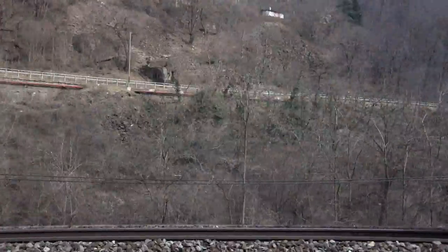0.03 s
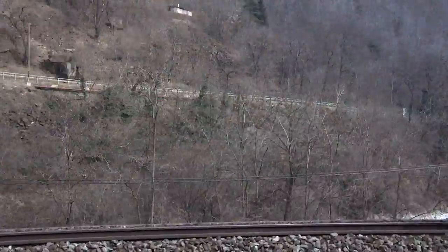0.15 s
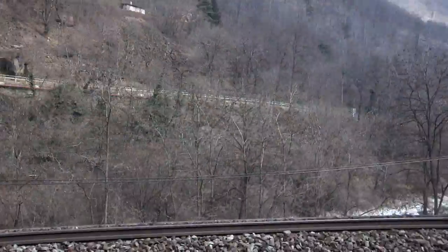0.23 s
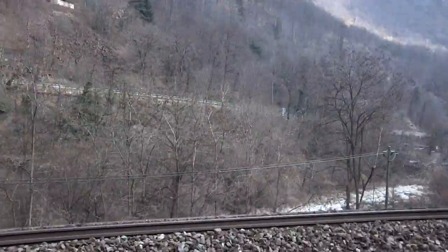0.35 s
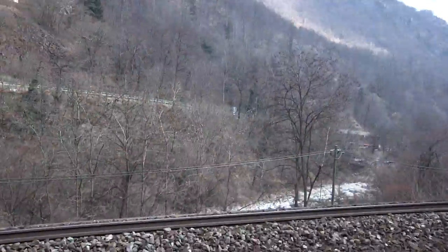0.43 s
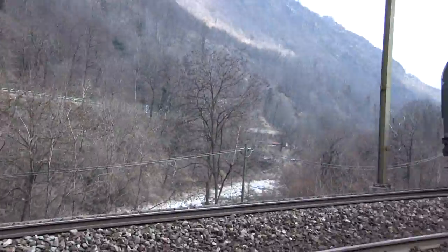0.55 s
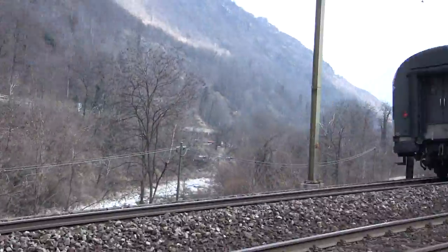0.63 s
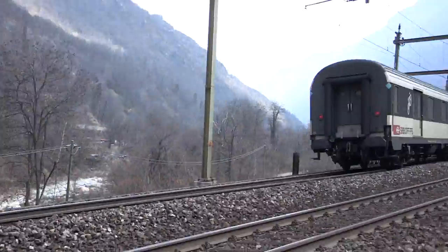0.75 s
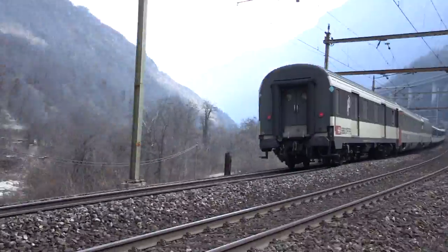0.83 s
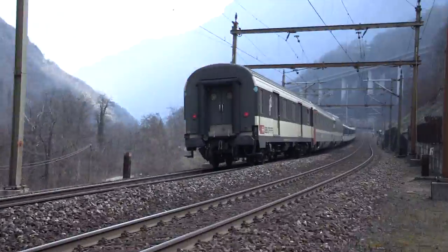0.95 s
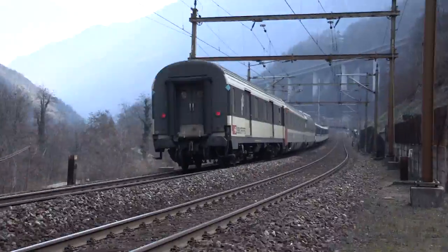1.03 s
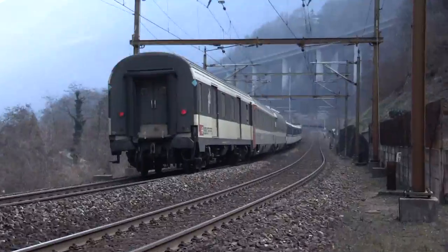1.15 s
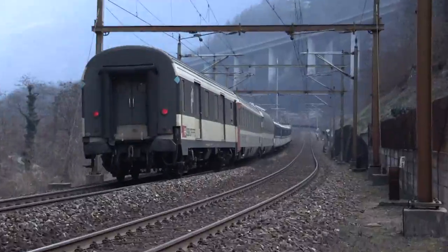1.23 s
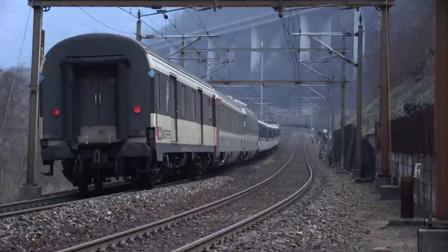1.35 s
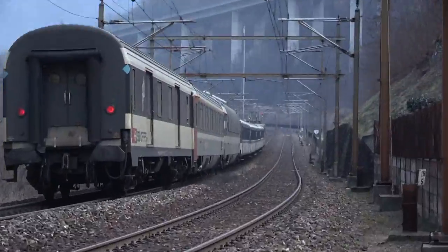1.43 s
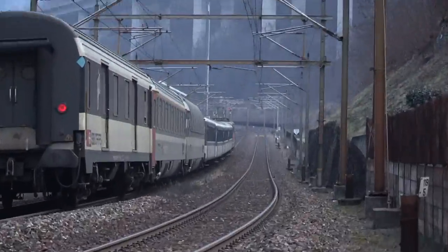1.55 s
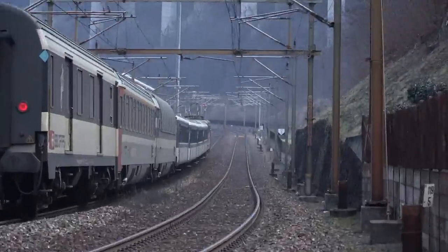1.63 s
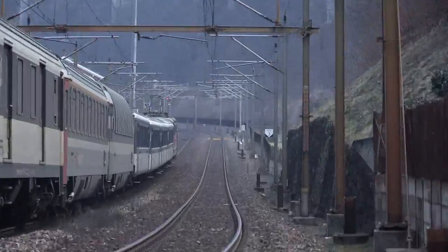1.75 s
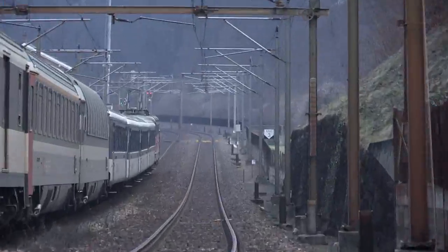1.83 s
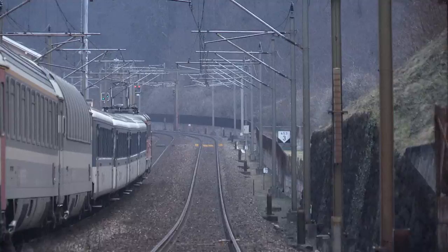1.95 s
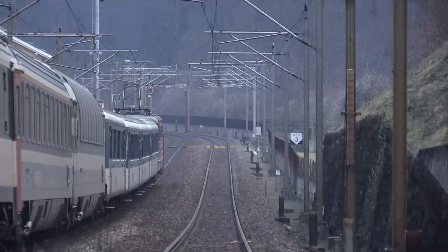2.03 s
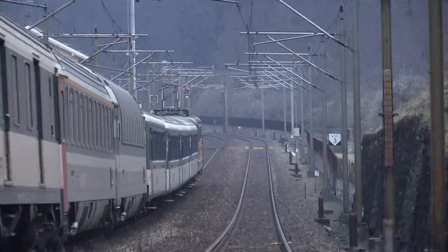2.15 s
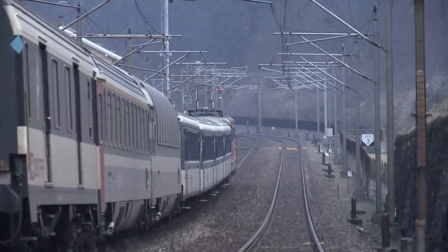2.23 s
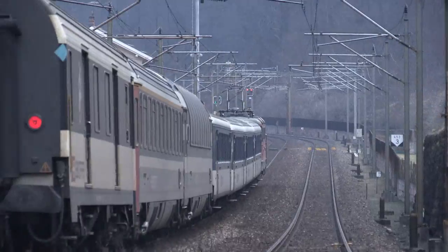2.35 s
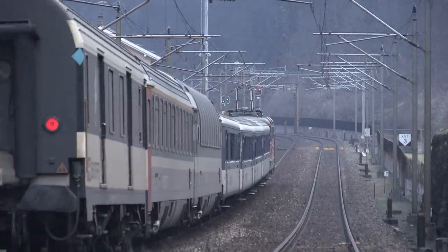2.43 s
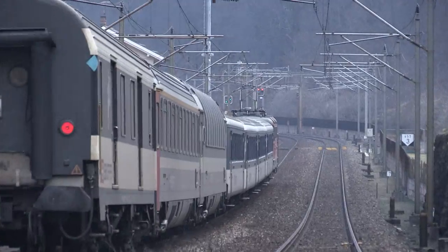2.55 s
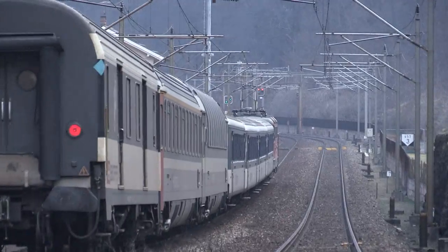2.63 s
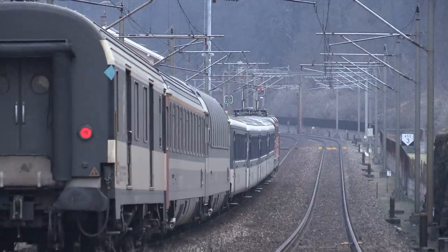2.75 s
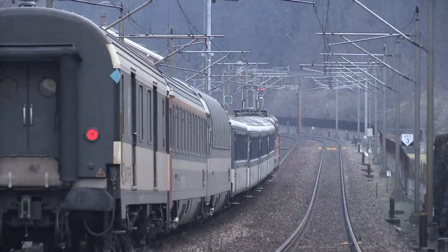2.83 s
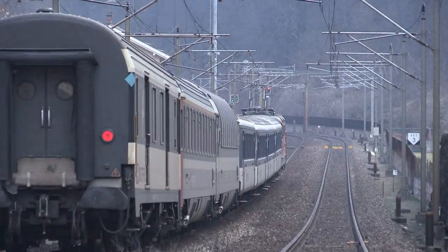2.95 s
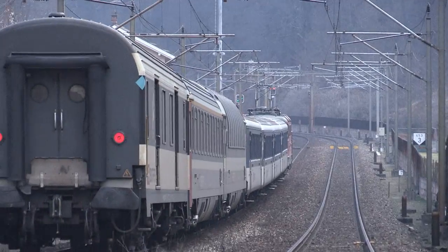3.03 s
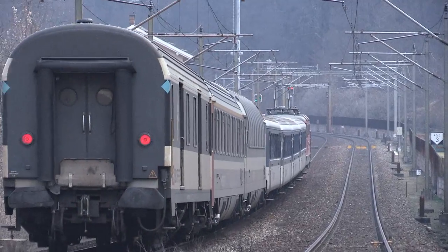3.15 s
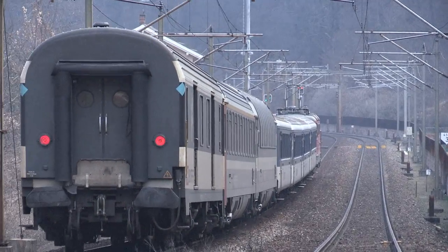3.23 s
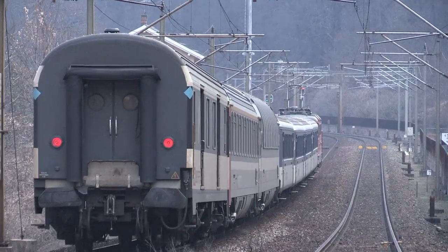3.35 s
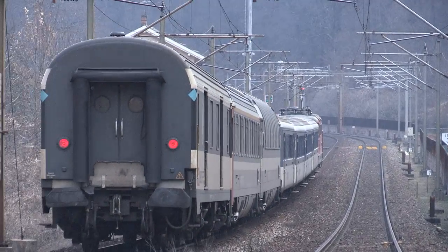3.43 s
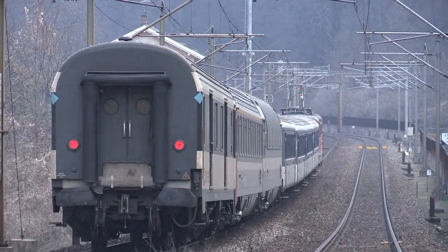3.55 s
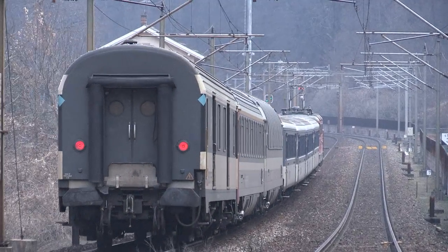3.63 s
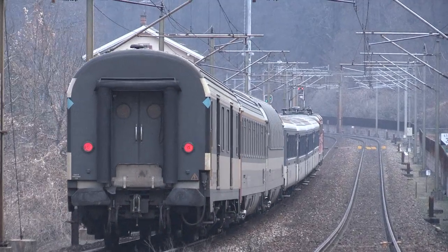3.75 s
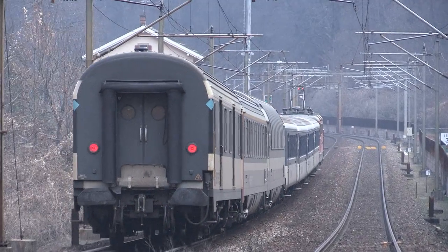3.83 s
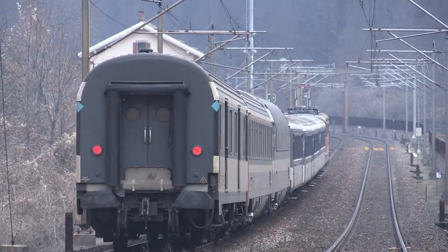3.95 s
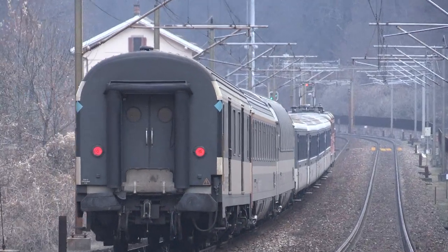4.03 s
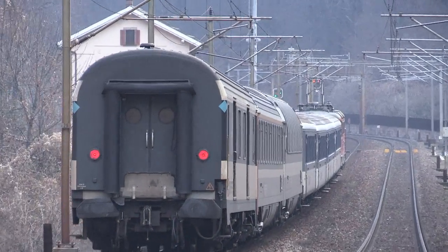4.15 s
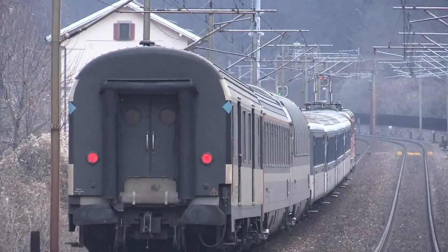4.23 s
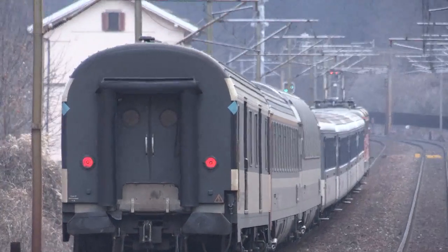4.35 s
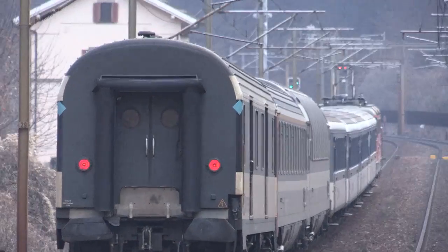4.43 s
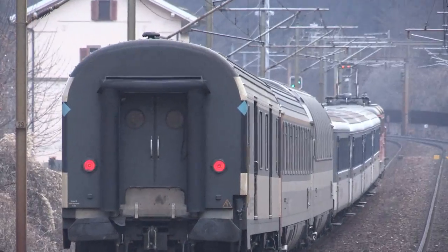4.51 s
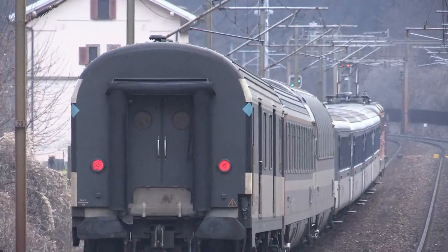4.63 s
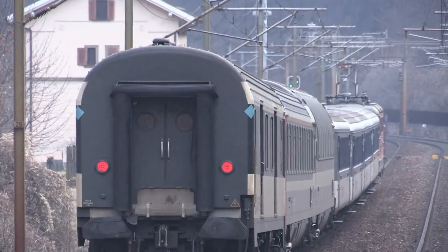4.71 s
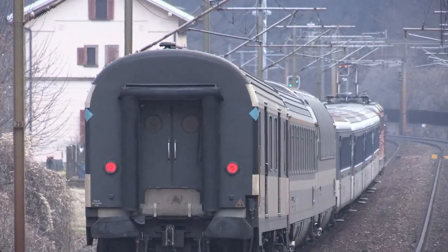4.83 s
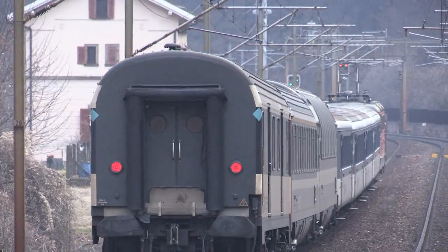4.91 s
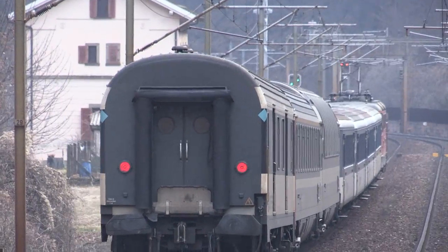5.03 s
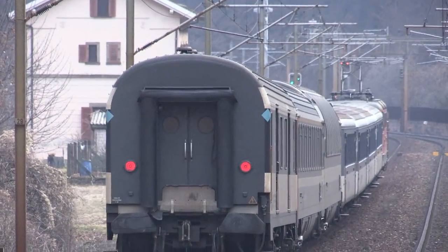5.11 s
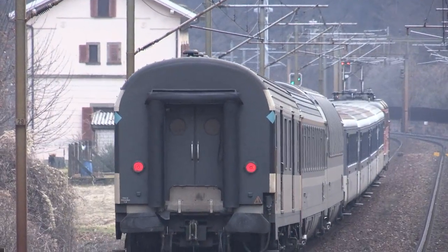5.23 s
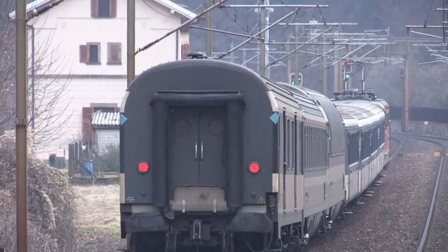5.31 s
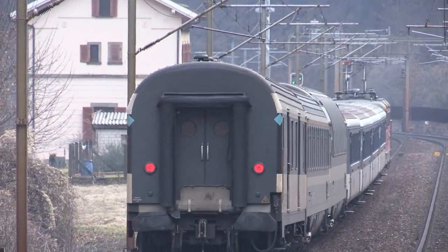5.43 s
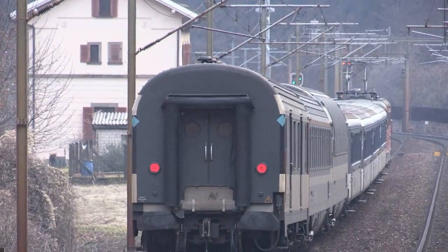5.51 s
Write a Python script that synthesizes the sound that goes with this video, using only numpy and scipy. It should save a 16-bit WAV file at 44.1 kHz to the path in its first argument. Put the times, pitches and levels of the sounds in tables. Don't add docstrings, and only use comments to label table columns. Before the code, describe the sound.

Outdoors in a valley, the tail of an electric train has just passed a hand-held camera. A loud, gritty wheel-and-rail roar with deep bass falls steeply over three seconds. Behind it, far rolling and high bell-like wheel ringing remain, with flange squeals biting harder around four to five seconds. A soft gust buffets the stereo microphone near the end, then one hollow knock.

```python
import sys
import numpy as np
from scipy import signal
from scipy.fft import rfft, irfft, next_fast_len
from scipy.io import wavfile
from scipy.ndimage import uniform_filter1d, map_coordinates

SR = 44100
rng = np.random.default_rng(int(sys.argv[2]) if len(sys.argv) > 2 else 0)


def volts(x):
    e = np.asarray(x, float) / 20
    return 10 ** e


def dump_mix(stems):
    frames = np.atleast_2d(stems).T
    limited = np.clip(frames, -1, 1)
    pcm = np.round(limited * 32767).astype(np.int16)
    wavfile.write(sys.argv[1], SR, pcm)


N = 246078
T = np.arange(N) / SR

# (time [s], sleeper roar level [dB])
COACH_ROAR = [(0, -13.5), (.25, -16), (.5, -18), (.8, -21.5), (1.0, -24), (1.25, -28), (2.0, -34),
              (2.3, -37.5), (2.75, -42), (2.95, -49.5), (3.6, -52)]


def unit(x):
    return x / np.sqrt(np.mean(x ** 2) + 1e-20)


def along(points, hz):
    f, v = np.transpose(points)
    return np.interp(np.log(hz + 1), np.log(f + 1), v)


def colour(points):
    return lambda hz: volts(along(points, hz))


def curves(rows):
    s, *cols = np.transpose(rows)
    return [np.interp(T, s, c) for c in cols]


def wobble(rate):
    knots = rng.standard_normal(int(N * rate / SR) + 4)
    return map_coordinates(knots, [T * rate])


def filtered(x, response):
    m = next_fast_len(N + SR // 2)
    hz = np.fft.rfftfreq(m, 1 / SR)
    return irfft(rfft(x, m) * response(hz), m)[..., :N]


def peak(hz, centre, width):
    return 1 / (1 + (2 * (hz - centre) / width) ** 2)


def rush(gain, alike, patchy_db):
    # (frequency [Hz], lead [radians])
    ear_lead = [(60, 0), (340, 0.28), (1030, 0.55), (3200, 0), (8000, 0)]
    z = signal.stft(rng.standard_normal((2, N)), nperseg=512)[2]
    patches = rng.standard_normal(z.shape[1:])
    patches = uniform_filter1d(patches, size=4, axis=0)
    patches = uniform_filter1d(patches, size=12, axis=1)
    pair = signal.istft(z * volts(patchy_db * unit(patches)), nperseg=512)[1][:, :N]

    def middle_and_side(hz):
        turn = np.arccos(np.clip(along(alike, hz), -1, 1)) / 2
        return gain(hz) * [np.cos(turn), np.sin(turn)]

    mid, side = filtered(pair, middle_and_side)
    lead = lambda hz: np.exp(.5j * np.outer([1, -1], along(ear_lead, hz)))
    return unit(filtered(np.array([mid + side, mid - side]), lead))


def hump(centre_hz, level_db, width_hz, apart):
    band = filtered(rng.standard_normal((3, 2, N)), lambda hz: np.exp(-(hz / width_hz) ** 2))
    turns = 2 * np.pi * np.cumsum(centre_hz + 0 * T) / SR
    tone = band[:, 0] * np.cos(turns) + band[:, 1] * np.sin(turns)
    return volts(level_db) * unit(tone[0] + apart * tone[1:])


def panned(x, pan_db):
    return x * volts(np.outer([.5, -.5], pan_db))


def swing(before, after):
    turn_s, turn_length_s = 0.73, .35
    return before + (after - before) / (1 + np.exp(-(T - turn_s) / (turn_length_s / 2)))


def far_pan():
    return swing(before=-7.5, after=1.7)


def last_coach():
    # (frequency [Hz], level [dB per Hz])
    track_colour = [(35, -84), (60, -47), (107, -25.5), (188, -8), (240, -13), (312, -17), (347, -4.5),
                    (386, -6.5), (450, -1.5), (592, -6.5), (964, -3.5), (1190, -10), (1750, -16),
                    (1920, -16.5), (2300, -19), (2990, -55), (5060, -120)]
    # (frequency [Hz], level [dB per Hz])
    contact_colour = [(1470, -38), (2500, -1), (2760, -13.5), (4950, -17), (6480, -18.5), (9490, -18.5),
                      (13300, -26.5), (15000, -29)]
    # (frequency [Hz], width [Hz], level [dB])
    track_modes = [(196, 8.3, 2.5), (374, 72, -2.5), (482, 51, 5.5), (528, 49, 1.5), (720, 51, -8),
                   (990, 58, -9.5), (990, 48, -8)]
    # (frequency [Hz], likeness [0 to 1])
    near_alike = [(60, 0.77), (130, 1), (290, 0.81), (640, 0.98), (1410, 0.63), (3100, 0.5), (6820, 0.19),
                  (15000, 0.46)]

    roar_db, = curves(COACH_ROAR)
    lost_db = roar_db[0] - roar_db
    pan_db = swing(before=-2.2, after=3)
    shake_db = 1.12
    hiss_db = np.maximum(-39.5 - 1.39 * lost_db, -75)
    sleeper_db = 1.07 * shake_db * wobble(23.98)
    rail_db = -1 + 0.12 * lost_db + shake_db * wobble(9.77)
    boom_db = 9 * np.exp(-T / 0.36)
    ballast_db = -21.5 + 0.33 * lost_db + boom_db + shake_db * wobble(11.54)
    ground_db = -4.5 + .15 * lost_db
    fade_db = -30 * np.clip(T - 3.0, 0, None)
    beat_db = .9 * wobble(30)

    def track_gain(hz):
        modes = np.sqrt(sum(volts(2 * db) * peak(hz, c, w) for c, w, db in track_modes))
        return colour(track_colour)(hz) * (0.92 + 0.57 * modes)

    roar = rush(track_gain, near_alike, patchy_db=0.86)
    above = lambda hz, edge_hz: 1 / (1 + (edge_hz / (hz + 1)) ** 6)
    ballast = filtered(roar, lambda hz: 1 - above(hz, edge_hz=270))
    ground = filtered(ballast, lambda hz: 1 - above(hz, edge_hz=174))
    rail = filtered(roar, lambda hz: above(hz, edge_hz=770))
    sleepers = roar - ballast - rail
    bass = ballast + (volts(ground_db) - 1) * ground
    bass = panned(bass, 4.5 - 1.4 * pan_db)
    roar = volts(sleeper_db) * sleepers + volts(ballast_db + 14) * bass + volts(rail_db) * rail

    hiss = rush(colour(contact_colour), near_alike, patchy_db=.4)
    hiss = panned(hiss, np.minimum(0.87 * pan_db, 0))
    roar = volts(roar_db + 3.0 + fade_db + beat_db) * roar
    hiss = volts(hiss_db + 6 + fade_db + 0.45 * beat_db) * hiss
    return panned(roar + hiss, pan_db)


def grinding():
    # (start [s], length [s], rise over the steady howl [dB])
    bites = [
        (3.85, 0.46, 9.5),
        (4.488, 0.47, 10.5),
    ]
    bite_s, let_go_s, sag_db = 0.086, 0.19, 5
    total_db = 0
    for s, length, db in bites:
        steps = np.cumsum([0, bite_s, length, let_go_s])
        total_db = total_db + np.interp(T - s, steps, [0, db, db - sag_db, 0])
    return total_db


def train_levels():
    # (time [s], rolling level [dB])
    distance = [(0, -34.5), (.2, -39), (.35, -38), (.55, -39.5), (.85, -41.5), (1.0, -43), (1.4, -46),
                (2.0, -48.5), (2.25, -51.5), (3.0, -54.5), (3.6, -54.5), (4.1, -53.5), (4.7, -57),
                (5.1, -54), (5.58, -54.5)]
    # (time [s], song above rolling [dB])
    slip = [(0, 4), (1.0, 6), (1.3, -1), (1.65, 6), (2.1, 2.5), (2.55, 7.5), (2.95, -0.5), (3.6, 0),
            (3.9, 5.5), (4.15, 7.5), (4.3, 12), (4.45, 7.5), (4.52, 14.5), (4.7, 11.5), (4.8, 10),
            (5.05, 10.5), (5.25, 1.5), (5.58, -14)]
    rolling_db, = curves(distance)
    slip_db, = curves(slip)
    sink_db = 4 * np.clip(T - 4.17, 0, None)
    flange_db = -3.5 + 0.23 * grinding() - sink_db
    return rolling_db, slip_db, flange_db


def far_train():
    # (frequency [Hz], level [dB per Hz])
    rolling_colour = [(29, -59), (50, -25), (448, -5), (562, -5.5), (809, 0), (1170, -6), (1440, -2.5),
                      (1600, -6), (2180, -12), (2380, -7.5), (3200, -23.5), (4160, -54), (7040, -120)]
    # (frequency [Hz], level [dB per Hz])
    flange_colour = [(1650, -16.5), (2800, 0), (4280, -9.5), (4750, -8.5), (6180, -18.5), (6460, -20.5),
                     (6980, -23), (9000, -40.5), (11700, -77), (19800, -120)]
    # (frequency [Hz], likeness [0 to 1])
    far_alike = [(60, 0.86), (180, 0.92), (550, 0.81), (1650, 0.86), (4970, 0.78), (15000, 0.72)]
    # (time [s], centre [Hz])
    howl_pitch = [
        (2.2, 1297),
        (3.5, 1410),
        (3.9, 1395),
        (4.7, 1254),
        (5.58, 1249),
    ]
    # (time [s], centre [Hz])
    drone_pitch = [
        (0, 761),
        (.3, 793.2),
        (1.0, 990),
        (1.4, 976.3),
        (2.8, 859.5),
    ]
    rolling_db, _, flange_db = train_levels()
    pan_db = far_pan()
    rolling = rush(colour(rolling_colour), far_alike, patchy_db=-0.7)
    rolling += volts(flange_db - 3) * rush(colour(flange_colour), far_alike, patchy_db=1.0)

    howl_db = -50.5 + grinding() + 0.87 * wobble(25)
    howl_db = howl_db - 35 * np.clip(2.93 - T, 0, None)
    howl = hump(curves(howl_pitch)[0], howl_db, width_hz=153, apart=0.37)

    drone_db = curves(COACH_ROAR)[0] - 7.5 + 0.5 * wobble(3.93)
    drone = hump(curves(drone_pitch)[0], drone_db, width_hz=97, apart=0.42)
    far_drone_db = -51 + 1.7 * wobble(9) - 40 * np.clip(3.8 - T, 0, None)
    drone += hump(766, far_drone_db, width_hz=84, apart=0.23)

    rolling = volts(rolling_db + 11.5 + 0.27 * wobble(12)) * rolling
    return panned(rolling + howl, pan_db) + panned(drone, 0.41 * pan_db)


def ringing(modes, flicker_db):
    ring = np.zeros((2, N))
    for c, w, db in modes:
        slow = filtered(rng.standard_normal((2, N)), lambda hz: peak(hz, 0, 1.63 * w))
        spread = np.exp(1j * 0.35 * np.array([wobble(13), wobble(19)]))
        tone = np.exp(2j * np.pi * c * T) * spread * (unit(slow[0]) + 1j * unit(slow[1]))
        ring += volts(db + flicker_db * wobble(18)) * np.real(tone)
    return ring


def wheels():
    # (frequency [Hz], width [Hz], level [dB])
    wheel_modes = [(1780, 29, 1), (1807, 18, -5), (2301, 10, -16), (2317, 10, -9), (2385, 19.5, 7),
                   (2463, 65, 4), (2830, 5.9, -4), (2930, 13, -11.5), (2896, 17, -6), (3050, 16, -7),
                   (3070, 10, -6), (3360, 39, -4.5), (3430, 36, -5.5), (3640, 17, -8), (3790, 22, -23),
                   (3940, 14, -11), (3930, 39, -5), (4550, 9.6, -18), (4570, 14, -21), (4720, 15, -11),
                   (4760, 16, -33.5), (4880, 16, -14), (5400, 5.3, -15), (5350, 5.1, -14), (6140, 16, -48),
                   (5792, 16, -47), (5960, 5.4, -21), (6169, 8.4, -41), (6670, 16, -40), (6860, 16, -31.5)]
    # (time [s], frequency [Hz], level [dB], length [s])
    squeals = [(0.317, 2420, -27, 0.13), (0.717, 1820, -26, 0.094), (1.037, 2440, -29.5, 0.061),
               (2.401, 4888, -52, 0.077), (2.67, 3410, -51, 0.09), (2.897, 4100, -50, 0.14),
               (3.15, 5270, -58, 0.29), (3.312, 4020, -54, 0.16), (3.413, 6058, -56, 0.073),
               (3.695, 5306, -55, 0.08), (3.795, 2930, -40, 0.13), (3.93, 6177, -61, 0.09),
               (4.016, 5370, -54, 0.12), (4.04, 4521, -50, 0.12), (4.072, 4830, -52, 0.08),
               (4.15, 2846, -42, 0.2), (4.17, 3350, -43, 0.07), (4.314, 4010, -50, 0.12),
               (4.4, 6054, -52, 0.079), (4.432, 5300, -57, 0.12), (4.564, 3790, -49, 0.095),
               (4.61, 4879, -55, 0.13), (4.684, 6100, -58, 0.17), (4.716, 1823, -44.5, 0.23),
               (4.962, 4850, -55, 0.095), (5.005, 3720, -52, 0.49), (5.06, 2880, -45, 0.11),
               (5.15, 5401, -63, 0.14), (5.32, 1819, -43.5, 0.16), (5.438, 2442, -42, 0.1)]
    rolling_db, slip_db, flange_db = train_levels()
    sing_db = rolling_db + slip_db + 1.4 * wobble(40)
    family = ringing([m for m in wheel_modes if 2300 < m[0] < 2500], flicker_db=1.0)
    family /= np.sqrt(np.abs(uniform_filter1d(family[0] ** 2, size=4000)) + 1e-9)
    others = ringing([m for m in wheel_modes if not 2300 < m[0] < 2500], flicker_db=2.0)
    smear_db = -2.5 * np.clip(2.8 - T, 0, None)

    song = np.zeros(N)
    for s, hz, db, length in squeals:
        cycles = np.cumsum(hz + 13 * wobble(70)) / SR
        squeal_db = db + 3 * wobble(60) - 2.5 * (hz < 3500)
        swell = np.exp(-(2.36 * (T - s) / length) ** 2)
        song += volts(squeal_db) * swell * np.sin(2 * np.pi * cycles)

    ring = volts(sing_db + 0.5 + 0.85 * smear_db) * family
    ring = ring + volts(rolling_db + flange_db + smear_db) * others
    return panned(ring + volts(-1.8) * song, far_pan())


def camera_hiss():
    # (frequency [Hz], level [dB per Hz])
    hiss_colour = [(4410, -33.5), (7500, -18), (9910, -6.5), (10400, -7), (12500, -4), (14500, -3.5)]
    # (time [s], level [dB])
    hiss_level = [
        (0, -70),
        (1.5, -62.5),
        (4.4, -67),
        (5.33, -71),
        (5.4, -64),
        (5.58, -63),
    ]
    hiss_db, = curves(hiss_level)
    return volts(hiss_db) * rush(colour(hiss_colour), [(7000, 0.31), (15000, 0.14)], patchy_db=2.5)


def gust():
    # (frequency [Hz], level [dB per Hz])
    buffet_colour = [(18, -54), (30, -24), (79, -7), (134, -2), (236, -1.5), (604, -9), (900, -19),
                     (1170, -51), (1980, -120)]
    # (start [s], attack [s], hold [s], release [s])
    gust_times = (4.545, 0.19, 0.43, 0.43)
    start, attack, hold, release = gust_times
    steps = np.cumsum([0, attack, hold, release])
    buffet_db = -46 + np.interp(T - start, steps, [-10, 0, 0, -9])
    before_db = -60 * np.clip(start - T, 0, None)
    lumps = volts(1.1 * np.array([wobble(22), wobble(21)]))
    air = rush(colour(buffet_colour), [(30, 0.68), (900, 0.3)], patchy_db=1.6)
    return volts(buffet_db + 6.5 + before_db) * unit(lumps * air)


def knock():
    # (time [s], frequency [Hz], level [dB], time to fall 60 dB [s])
    taps = [
        (5.542, 1660, -28, .055),
    ]
    (s, hz, db, t60), = taps
    t = np.clip(T - s, 0, None)
    click = filtered(rng.standard_normal(N), lambda f: peak(f, 2500, 4000)) * volts(-60 * t / .03)
    ring = np.sin(2 * np.pi * hz * t) + .6 * click
    return volts(db - 60 * t / t60) * (1 - np.exp(-t / .002)) * ring


def scene():
    return last_coach() + far_train() + wheels() + gust() + knock()


def band_limit(x):
    return signal.sosfilt(signal.butter(12, 16410, fs=SR, output="sos"), x)


def record(dry):
    mix = dry + camera_hiss()
    mix = mix / (1 + np.abs(mix) ** 12) ** (1 / 12)
    mix = filtered(mix, lambda hz: hz ** 2 / (hz ** 2 + 35 ** 2))
    return band_limit(mix)


dry = scene()
out = record(dry)
dump_mix(out)
```